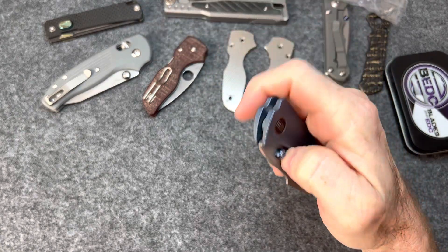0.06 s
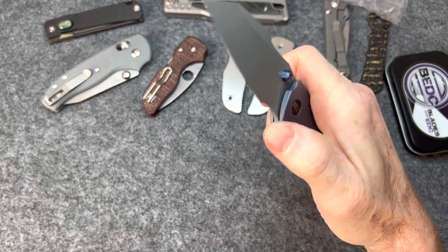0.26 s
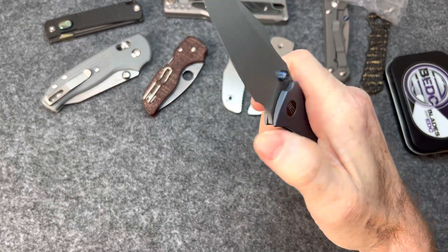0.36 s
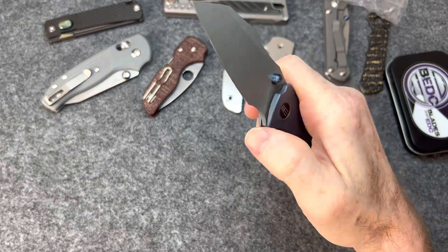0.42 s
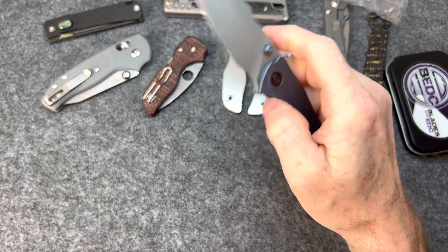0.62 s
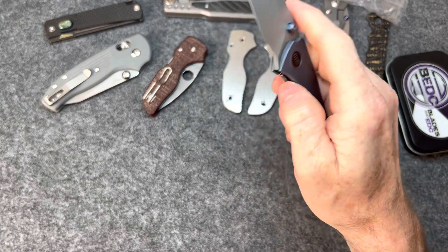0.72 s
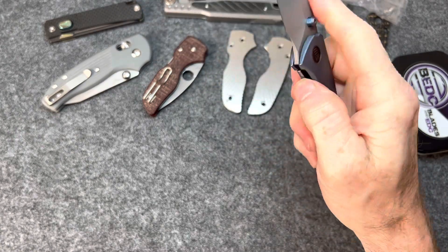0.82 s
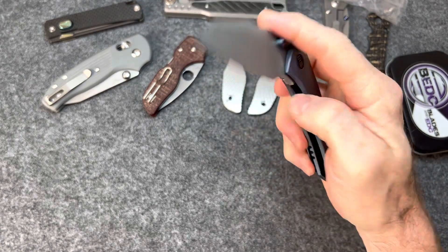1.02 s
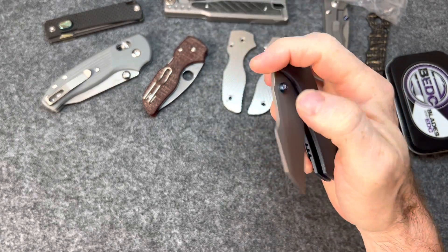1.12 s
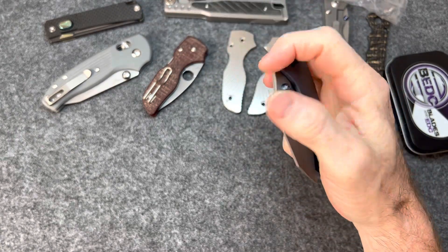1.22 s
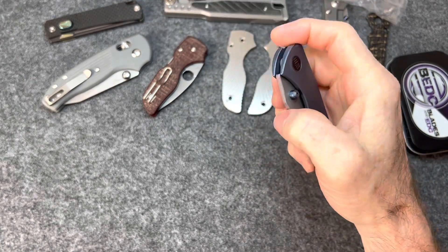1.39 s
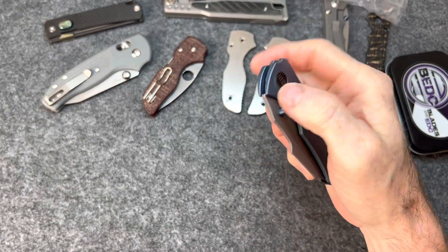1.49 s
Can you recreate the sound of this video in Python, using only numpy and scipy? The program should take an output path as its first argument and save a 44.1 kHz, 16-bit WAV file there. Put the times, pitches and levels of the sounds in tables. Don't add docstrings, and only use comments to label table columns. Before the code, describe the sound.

A folding knife snaps open with a loud metallic clack, then unlocks and clicks shut

```python
import sys
import numpy as np
from scipy import signal
from scipy.fft import rfft, irfft
from scipy.io import wavfile
from scipy.ndimage import uniform_filter1d

SR = 44100
rng = np.random.default_rng(int(sys.argv[2]) if len(sys.argv) > 2 else 0)


def level_to_linear(level):
    exponent = np.asarray(level, float) / 20
    return 10 ** exponent


def log_audio(samples):
    frames = np.atleast_2d(samples).T
    limited = np.clip(frames, -1, 1)
    pcm = np.round(limited * 32767).astype(np.int16)
    wavfile.write(sys.argv[1], SR, pcm)


N = 68355


def read(points, hz):
    f, value = np.transpose(points)
    return np.interp(np.log(hz + 1), np.log(f + 1), value)


def evened(x):
    return x / np.sqrt(np.mean(x ** 2) + 1e-20)


def add(mix, s, sound):
    part = mix[round(s * SR):][:len(sound)]
    part += sound[:len(part)]


def noise(points, size):
    full = max(size, 8192)
    hz = np.fft.rfftfreq(full, 1 / SR)
    spectrum = rfft(rng.standard_normal(full)) * level_to_linear(read(points, hz))
    return evened(irfft(spectrum, full))[:size]


def resonate(x, hz, width):
    r = np.exp(-np.pi * width / SR)
    pole = r * np.exp(2j * np.pi * hz / SR)
    return 2 * signal.lfilter([1 - r], [1, -pole], x + 0j).real


def wavering_tone(size, hz, width):
    once = resonate(rng.standard_normal(size), hz, width)
    return resonate(once, hz, width)


# (frequency [Hz], level [dB])
TONE_COLOUR = [(15, -8.5), (60, -2.5), (140, -9), (474, -25), (847, -33), (2080, -39), (6100, -41.5),
               (15400, -44)]
# (frequency [Hz], width [Hz], level [dB])
HUM = [(29.07, 7.4, -55.5), (92, 38, -53.5)]


def room_tone():
    t = np.arange(N) / SR
    air = level_to_linear(-50) * noise(TONE_COLOUR, N)
    hum = sum(level_to_linear(db) * evened(wavering_tone(2 * N, hz, width)[N:]) for hz, width, db in HUM)
    motor_hz, motor_db = 29.5, -47
    motor = level_to_linear(motor_db) * np.sqrt(2) * np.sin(2 * np.pi * motor_hz * t)
    return air + hum + motor


# (time [s], level [dB], colour centre [Hz], length [s])
TICKS = [(.1617, -42, 2900, .008), (.1612, -45, 7900, .005), (.1812, -35, 1300, .005),
         (.1802, -44, 700, .006), (.9358, -52, 6000, .02), (.9365, -44, 1450, .012),
         (.9365, -49, 780, .015), (.9585, -39, 7500, .004), (.9590, -44, 1600, .006),
         (.122, -59, 2990, .0067), (.599, -61, 2970, .07), (.9585, -46, 3600, .005),
         (.937, -51, 3000, .012), (.9585, -50, 13000, .003), (.602, -58, 1300, .04), (.179, -44, 2600, .01),
         (.180, -44, 5500, .006)]


def ticks():
    out, t = np.zeros(N), np.arange(SR // 20) / SR
    for s, db, hz, length in TICKS:
        colour = [(hz / 5, -20), (hz / 1.5, -4), (hz, 0), (hz * 1.5, -8), (hz * 4, -30)]
        add(out, s, noise(colour, len(t)) * level_to_linear(db - 30 * t / length))
    return out


# (frequency [Hz], time to fade 60 dB [s])
ROOM_DECAY = [(200, 0.042), (1000, 0.24), (3000, 0.22), (6000, 0.2), (10000, .2), (16000, 0.22)]


def room(x):
    hz, t, z = signal.stft(rng.standard_normal(SR // 2), SR, nperseg=128)
    fade = level_to_linear(-60 * t / read(ROOM_DECAY, hz)[:, None])
    tail = signal.istft(z * fade, SR, nperseg=128)[1]
    build_up_s = 0.0038
    tail = tail * np.clip(np.arange(len(tail)) / SR / build_up_s, 0, 1) ** 2
    return signal.fftconvolve(x, tail / np.linalg.norm(tail))[:N]


# (start time [s], rise [s], hold [s], fall [s], level [dB])
SLIDES = [
    (0.161, 0.013, 0.02, 0.014, -38.5),
    (0.2, 0.0079, .008, 0.0046, -40),
    (0.947, .04, 0.059, 0.102, -62),
    (1.171, 0.017, 0.0066, 0.019, -73.5),
    (1.523, 0.022, .03, .01, -74),
]
# (frequency [Hz], level [dB])
SLIDE_COLOUR = [(500, -35), (1500, -10), (4400, -6.5), (6500, -4.5), (9000, -4.5), (10600, -12.5),
                (12300, -6), (15400, -8.5)]
# (frequency [Hz], width [Hz], level [dB])
SLIDE_RINGS = [(5800, 300, -6), (7600, 300, -3), (8340, 200, -1), (9200, 400, -2), (12100, 350, -6),
               (14200, 400, -10)]


def slides():
    out, t = np.zeros(N), np.arange(N) / SR
    grit = rng.standard_normal(N)
    unsteady = evened(uniform_filter1d(rng.standard_normal(N), size=90))
    grit = grit * level_to_linear(1.6 * unsteady)
    rings = np.zeros(N)
    for hz, width, db in SLIDE_RINGS:
        waver = evened(uniform_filter1d(rng.standard_normal(N), size=700))
        rings += level_to_linear(db + 2.4 * waver) * evened(resonate(grit, hz, width))
    rings = evened(rings)
    rub = noise(SLIDE_COLOUR, N)
    for s, rise, hold, fall, db in SLIDES:
        end = s + rise + hold + fall
        swell = np.clip(np.minimum((t - s) / rise, (end - t) / fall), 0, 1) ** 2
        ring_db = 1 - 0.2 * (db - SLIDES[0][4])
        out += level_to_linear(db) * swell * (rub + level_to_linear(ring_db) * rings)
    return out


def steel(blows, modes, crack, damp, crack_db, crack_t60, spread_db, rise_s, low_hz):
    out, t = np.zeros(N), np.arange(SR // 4) / SR
    hz, db, t60 = np.transpose(modes)[:, :, None]
    thin = signal.butter(2, low_hz, "high", fs=SR, output="sos")
    fade = level_to_linear(-60 * t / (damp * np.minimum(t60, .2)))
    for s, blow_db, bright_db in blows:
        luck = rng.standard_normal((3, len(modes), 1))
        size = level_to_linear(db + spread_db * luck[0] + bright_db * np.log2(hz / 7000))
        wobble = uniform_filter1d(rng.standard_normal((len(modes), len(t))), size=130, axis=1)
        flutter = level_to_linear(4 * evened(wobble))
        wave = np.sin(2 * np.pi * hz * (1 + 0.007 * luck[1]) * t + 2 * luck[2])
        ring = (size * flutter * fade * wave).sum(0)
        ring = ring * (1 - np.exp(-t / rise_s)) / np.linalg.norm(size)
        ring = signal.sosfilt(thin, signal.sosfilt(thin, ring))
        colour = [(f, d + bright_db * np.log2(max(f, 3000) / 7000)) for f, d in crack]
        snap = noise(colour, len(t)) * level_to_linear(crack_db - 60 * t / crack_t60)
        snap = snap * np.minimum(t / .0003, 1)
        add(out, s, level_to_linear(blow_db) * (ring + snap))
    return out


# (time [s], level [dB], brightness [dB per octave])
OPEN_BLOWS = [(.2094, 2.5, 12), (.2110, -1.5, 13.5), (.2128, 2, -6.5), (.2150, 1, 0), (.2175, 3, -3),
              (.2212, -1.5, -10.5), (.2232, 3, -5.5), (.2268, -3.5, -1), (.2306, -3.5, -2.5),
              (.2338, -14.5, -4.5), (.2425, -20.5, 0.5), (.2610, -23, -0.5)]
# (frequency [Hz], level [dB], time to fade 60 dB [s])
OPEN_MODES = [(2155, -20.5, .06), (4376, -8, .04), (4680, -13.5, 0.086), (5417, 0.5, 0.04),
              (5720, -0.5, 0.031), (6045, -0.5, 0.052), (6477, -6.5, 0.025), (7143, -5.5, 0.055),
              (7602, -3, .06), (8386, -1.5, 0.055), (9370, -6, 0.046), (11460, -2.5, 0.024),
              (14320, -9, 0.028), (13400, -10, 0.04)]
# (frequency [Hz], level [dB])
OPEN_CRACK = [(88, -50.5), (150, -22), (946, -22.5), (2800, -7), (3970, -9), (5850, 6.5), (12500, -0.5),
              (14600, -6.5), (15400, -20.5)]


def slam():
    return steel(OPEN_BLOWS, OPEN_MODES, OPEN_CRACK, damp=0.33, crack_db=-1.0, crack_t60=0.012,
                 spread_db=3, rise_s=0.00021, low_hz=2000)


# (frequency [Hz], level [dB], time to fade 60 dB [s])
AFTER_RING = [(5400, -72, 1.2), (6050, -66, 1.2), (7300, -72, 1.1)]


def singing():
    out, t = np.zeros(N), np.arange(N) / SR - OPEN_BLOWS[0][0]
    for hz, db, t60 in AFTER_RING:
        out += level_to_linear(db - 60 * t / t60) * (t > 0) * evened(resonate(rng.standard_normal(N), hz, 40))
    return out


# (time [s], burst length [s], level [dB])
WASHES = [
    (.212, .022, -16.5),
    (1.2905, .008, -28.5),
    (.8475, .006, -40),
]
# (frequency [Hz], level [dB])
OPEN_WASH = [(500, -36), (1000, -25.5), (2600, -13.5), (3900, -15), (5800, -3), (8000, -4.5), (11000, -15),
             (15500, -19.5)]
SHUT_WASH = [(400, -9), (1300, -14), (2600, -16), (3500, -9.5), (5130, -7), (8300, -5.5), (11000, -11.5),
             (15500, -22)]
LOCK_WASH = [(700, -33), (2050, -4), (3100, -20), (4300, 1), (6000, -2), (8400, -8), (10000, -18),
             (15500, -24)]
# (frequency [Hz], width [Hz], level [dB])
OPEN_BANDS = [(2265, 190, -17.5), (4410, 170, -15.5), (5500, 240, -7), (6110, 300, -5.5), (11500, 400, -16),
              (13900, 600, -14.5)]
SHUT_BANDS = [(2127, 97, -8.5), (5160, 130, -13), (8370, 230, -12), (11300, 300, -20)]
LOCK_BANDS = [(2020, 200, -9.5), (6050, 300, -9), (8500, 150, -11), (14320, 200, -20)]


def washes():
    out, t = np.zeros(N), np.arange(SR // 10) / SR
    colours = (OPEN_WASH, SHUT_WASH, LOCK_WASH)
    all_bands = (OPEN_BANDS, SHUT_BANDS, LOCK_BANDS)
    for (s, length, db), colour, bands in zip(WASHES, colours, all_bands):
        rings = sum(level_to_linear(band_db) * evened(wavering_tone(len(t), hz, w)) for hz, w, band_db in bands)
        swell = np.sqrt(2) * np.sin(np.pi * np.minimum(t / length, 1))
        burst = np.zeros(N)
        add(burst, s, level_to_linear(db) * (noise(colour, len(t)) + rings) * swell)
        out += room(burst)
    return out


# (time [s], level [dB])
THUDS = [
    (.597, -28.5),
    (0.61, -33.5),
    (.621, -39.5),
    (.636, -41),
    (0.657, -40),
]
# (frequency [Hz], level [dB], time to fade 60 dB [s])
THUD_MODES = [(98.4, 2, 0.084), (148, -3, 0.051), (346.6, -8, 0.08), (603, -16.5, 0.056), (881, -23, 0.064)]
# (frequency [Hz], level [dB])
THUD_COLOUR = [(100, -13.5), (400, 5.5), (1200, -15.5), (2000, -33), (3000, -22), (5000, -49)]


def thud():
    out, t = np.zeros(N), np.arange(SR // 4) / SR
    hz, mode_db, t60 = np.transpose(THUD_MODES)[:, :, None]
    for s, db in THUDS:
        modes = (level_to_linear(mode_db - 60 * t / t60) * np.sin(-2 * np.pi * hz * t)).sum(0)
        puff = noise(THUD_COLOUR, len(t)) * level_to_linear(-14.0 - 60 * t / 0.093)
        add(out, s, level_to_linear(db) * np.minimum(t / 0.0052, 1) * (modes + puff))
    return out


# (time [s], level [dB], brightness [dB per octave])
LOCK_CREAKS = [
    (.775, -62, 6),
    (.828, -47, 0),
    (.830, -43, 1),
    (.837, -48, 2),
    (.841, -48, 0),
]
# (frequency [Hz], level [dB], time to fade 60 dB [s])
CREAK_MODES = [(2200, -8, 0.027), (4560, -1, 0.026), (4800, -15, 0.025), (6150, -27, 0.028),
               (8500, -1, 0.033), (11390, -11, 0.025), (14300, -17.5, 0.043)]
# (frequency [Hz], level [dB])
LOCK_CRACK = [(700, -58), (1100, -21), (1600, -9.5), (3170, -10.5), (4400, -7.5), (6550, 5.5), (10400, -13),
              (15400, -21.5)]


def creaks():
    return steel(LOCK_CREAKS, CREAK_MODES, LOCK_CRACK, damp=1.0, crack_db=-10.0, crack_t60=0.021,
                 spread_db=1.0, rise_s=0.00096, low_hz=1100)


# (time [s], level [dB], brightness [dB per octave])
LOCK_BLOWS = [
    (.8472, -20.5, -2),
    (.8480, -20.5, 6),
    (.8546, -30, 1),
    (.8620, -38, 0),
    (.8660, -40.5, 1),
]
# (frequency [Hz], level [dB], time to fade 60 dB [s])
LOCK_MODES = [(1570, 5.5, 0.021), (2030, -13.5, 0.14), (4340, 5, 0.1), (4430, 8.5, 0.036),
              (5318, 0.5, 0.087), (6050, 6, 0.066), (6660, 7, 0.045), (7500, -6, 0.069),
              (8300, 5.5, 0.0897), (10300, -7, 0.08), (14320, -14.5, 0.11)]


def lock_release():
    return steel(LOCK_BLOWS, LOCK_MODES, LOCK_CRACK, damp=0.25, crack_db=1, crack_t60=0.013,
                 spread_db=1.85, rise_s=.0003, low_hz=970)


# (time [s], level [dB], brightness [dB per octave])
SHUT_BLOWS = [
    (1.2867, -43, 7),
    (1.2904, -9.5, -1.5),
    (1.2914, -9.5, 3),
    (1.2930, -21, -2),
    (1.2945, -17.5, 3),
    (1.2977, -18.5, 3),
    (1.3050, -21.5, 0.5),
    (1.3127, -28, -5),
]
# (frequency [Hz], level [dB], time to fade 60 dB [s])
SHUT_MODES = [(2013, -11, 0.058), (2143, -8.5, 0.096), (3220, -16, 0.052), (4000, -12.5, .04),
              (5080, -3.5, 0.065), (5240, -5, 0.084), (5954, -2.5, 0.038), (7530, -5.5, 0.06),
              (8540, 1, 0.08), (8410, -0.5, 0.04), (8940, -8.5, .04), (9680, -7.5, .04),
              (11405, -16.5, 0.08), (6400, -0.5, 0.041)]
# (frequency [Hz], level [dB])
SHUT_CRACK = [(120, -42), (250, -12), (800, -20), (1500, -16), (2140, -11), (5500, -1), (12000, -9.5),
              (15400, -19.5)]


def snap_shut():
    return steel(SHUT_BLOWS, SHUT_MODES, SHUT_CRACK, damp=0.44, crack_db=-2.0, crack_t60=0.012,
                 spread_db=0.99, rise_s=0.00018, low_hz=1100)


# (frequency [Hz], level [dB], time to fade 60 dB [s])
HANDLE_MODES = [(270, -36, 0.028), (460, -34, 0.038), (713, -33.5, 0.046), (832, -36.5, .035),
                (1054, -40, 0.085), (1387, -35, 0.043), (1533, -32.5, .06), (1830, -40, 0.054)]


def handle():
    out, t = np.zeros(N), np.arange(SR // 8) / SR
    hz, db, t60 = np.transpose(HANDLE_MODES)[:, :, None]
    knock = (level_to_linear(db - 60 * t / t60) * np.sin(2 * np.pi * hz * t)).sum(0)
    add(out, SHUT_BLOWS[1][0], knock)
    return out


def scene():
    opening = slam()
    closing = snap_shut() + handle()
    lock = lock_release()
    small = creaks() + ticks() + slides()
    wet = level_to_linear(-20.5) * opening + level_to_linear(-19.5) * closing + level_to_linear(-22) * lock + level_to_linear(-9) * small
    knife = opening + closing + lock + small
    return (knife + room(wet) + singing() + thud() + room_tone() + washes())[None]


def top_cut(x):
    return signal.sosfilt(signal.butter(12, 15580, fs=SR, output="sos"), x)


def record(dry):
    mix = np.clip(dry, -1.0, 1.0)
    return top_cut(mix)


dry = scene()
out = record(dry)
log_audio(out)
```